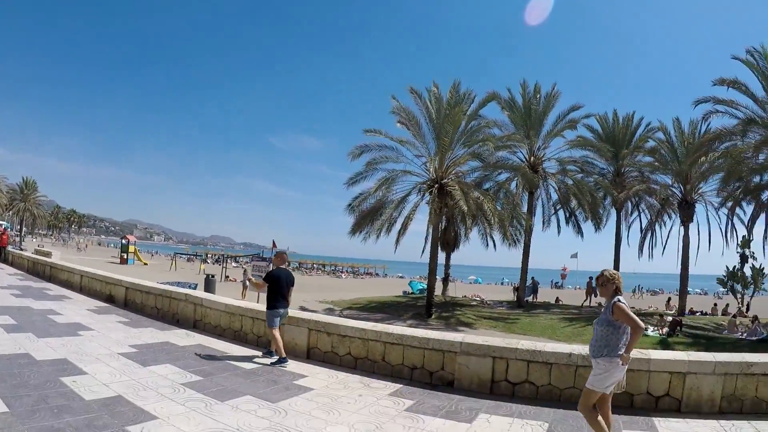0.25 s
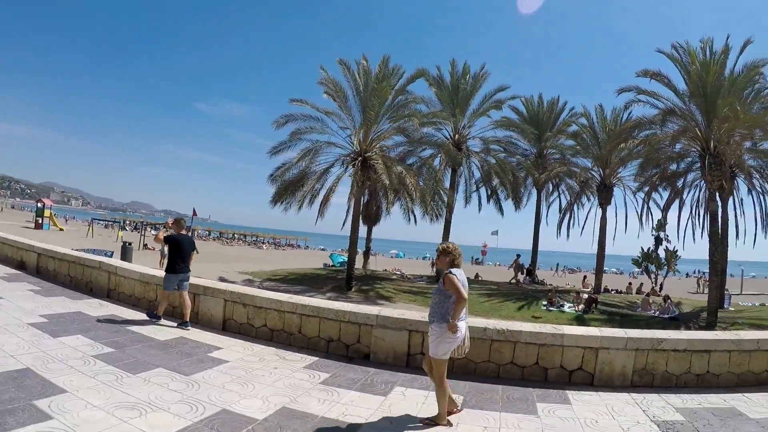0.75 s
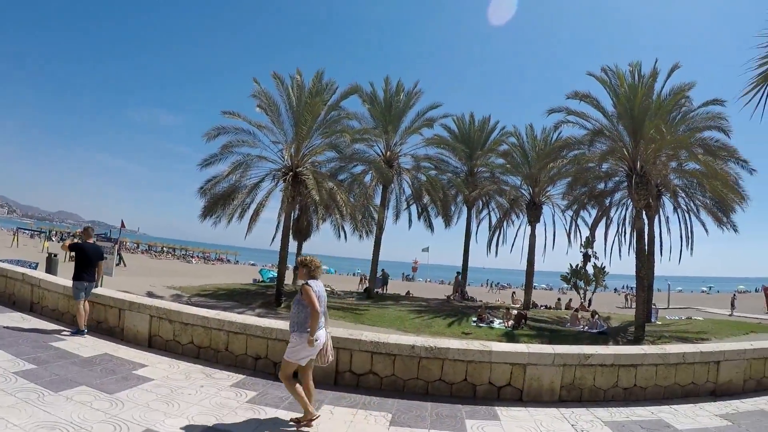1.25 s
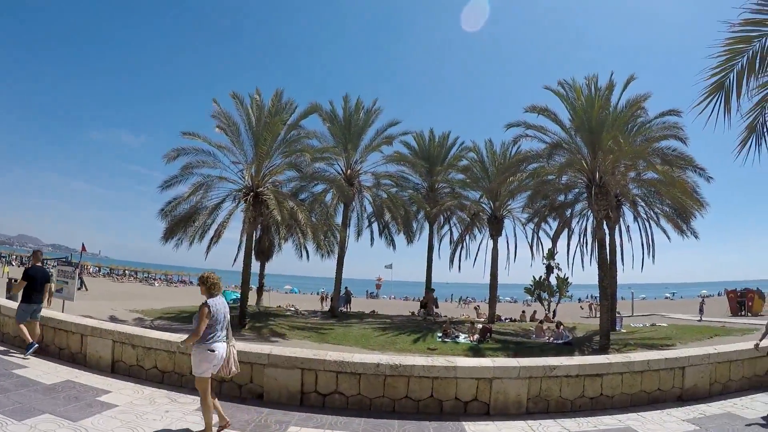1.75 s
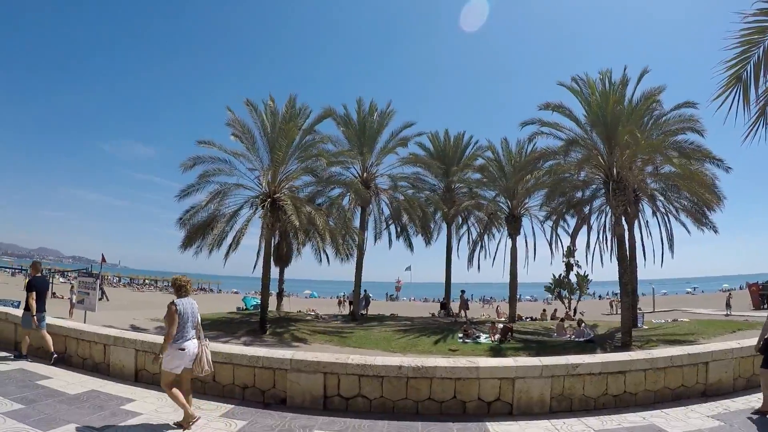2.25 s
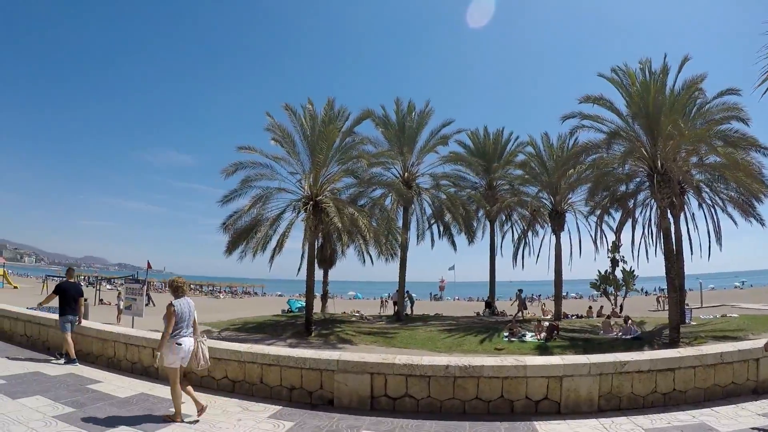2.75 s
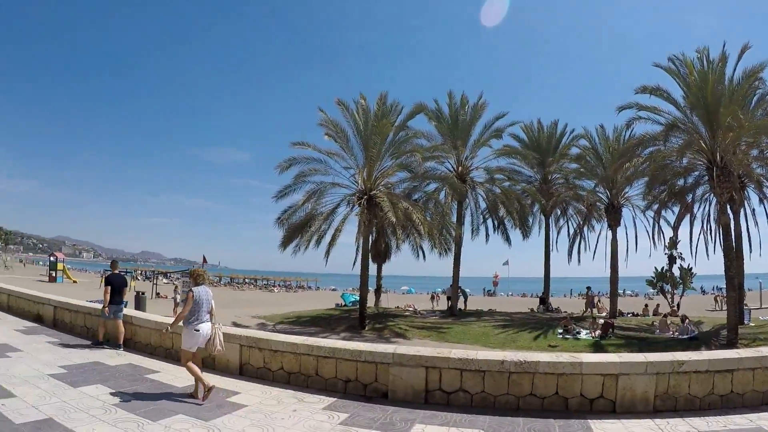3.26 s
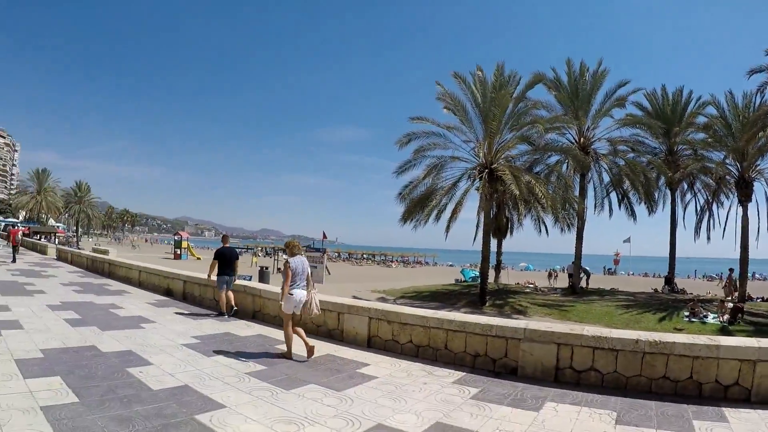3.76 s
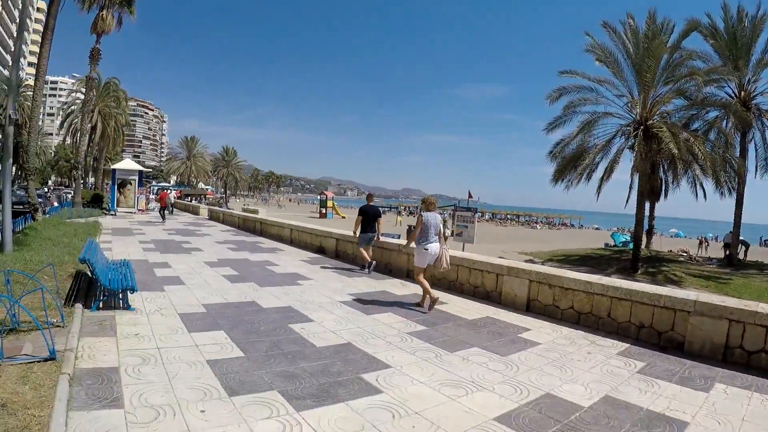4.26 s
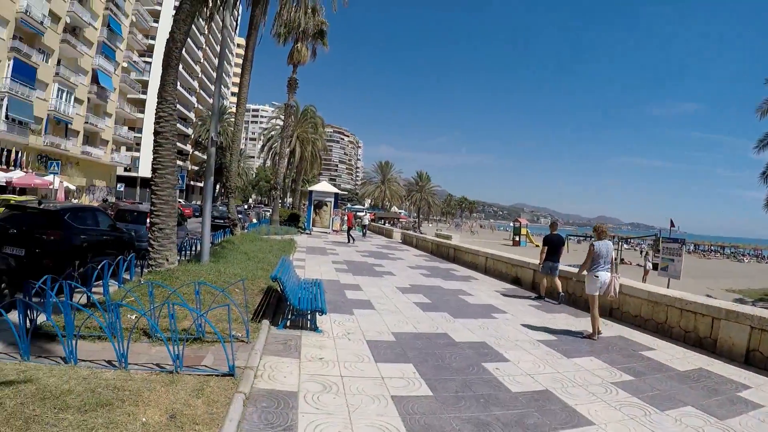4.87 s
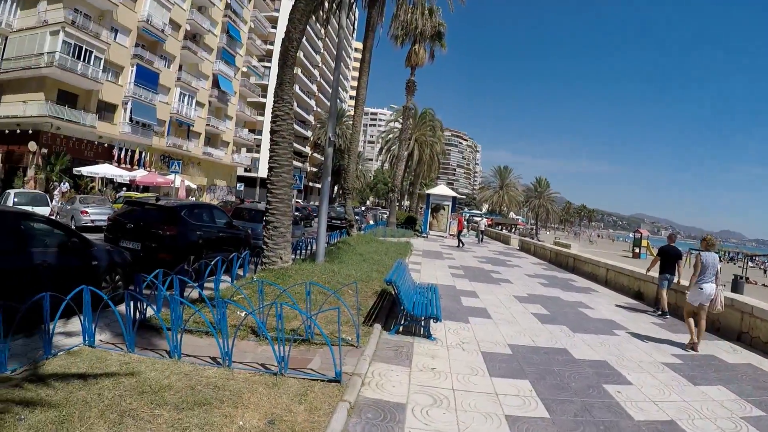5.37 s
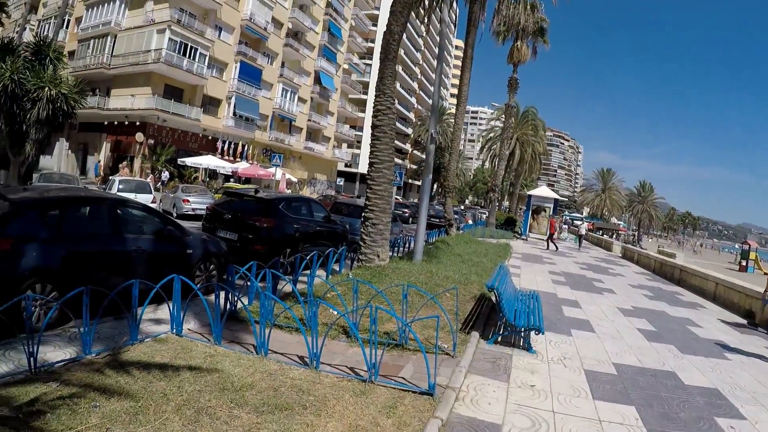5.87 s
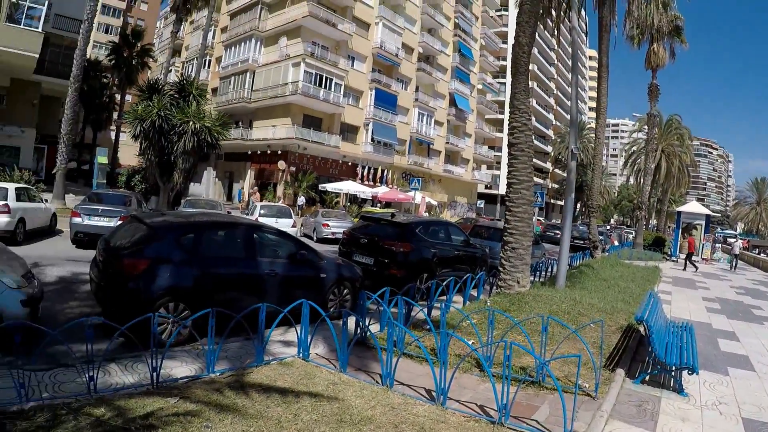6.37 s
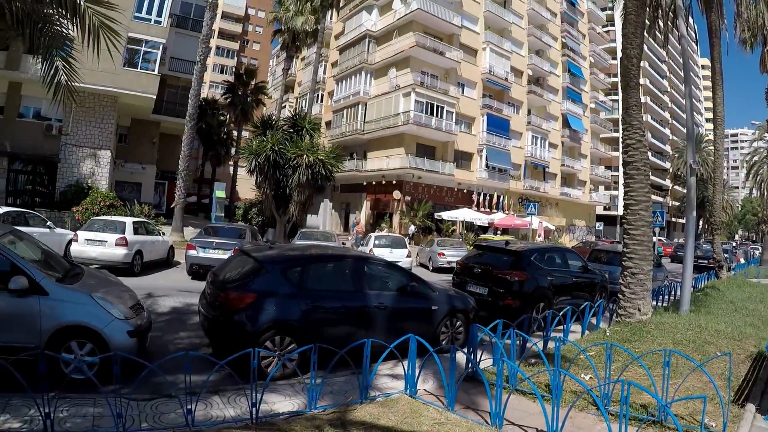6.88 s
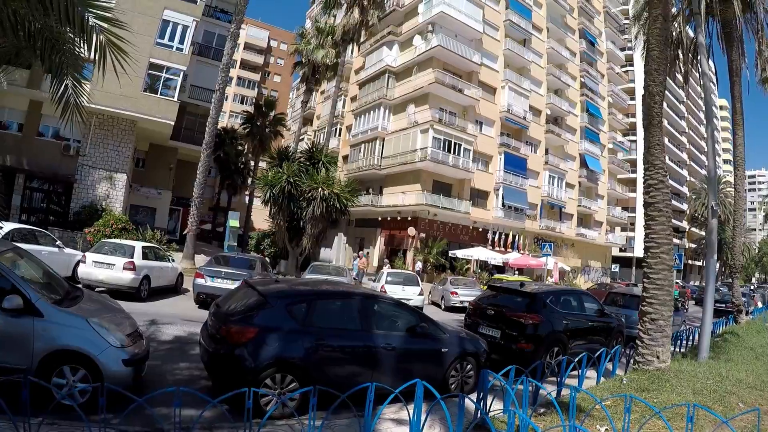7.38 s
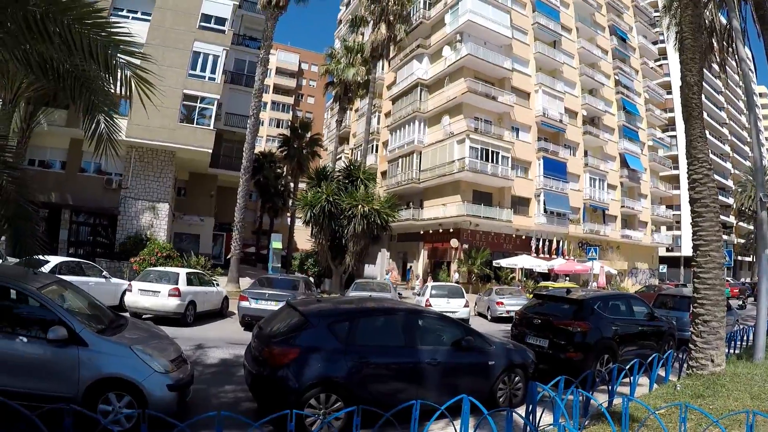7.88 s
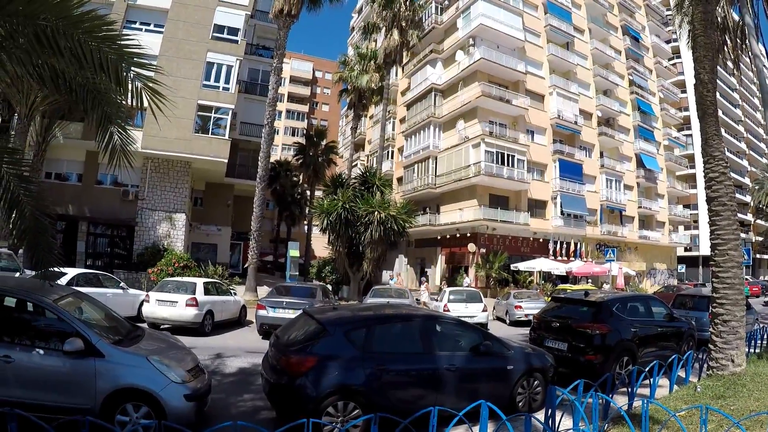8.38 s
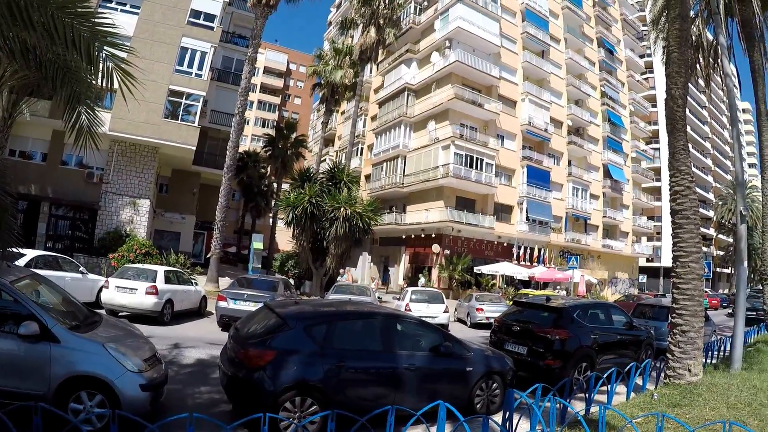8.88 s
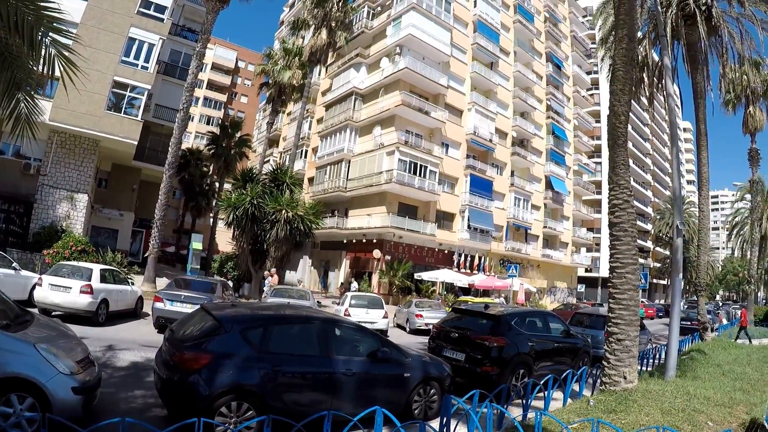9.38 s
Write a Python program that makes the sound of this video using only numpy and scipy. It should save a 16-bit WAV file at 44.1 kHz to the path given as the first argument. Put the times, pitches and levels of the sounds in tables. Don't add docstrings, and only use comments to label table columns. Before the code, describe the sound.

Harsh parrot chatter sits close and slightly left of centre, with hoarse rasps, quick warbles, a brief thin whistle near the start and chopped rattling trills later. Calls come in separate bursts, then almost without pause toward the end. Underneath, wind thumps unevenly on a small handheld stereo microphone, and a low motor tone passes. Distant surf and road noise form a soft bed, with short diffuse reflections outdoors.

```python
import sys
import numpy as np
from scipy import signal
from scipy.fft import rfft, irfft, next_fast_len
from scipy.io import wavfile
from scipy.ndimage import uniform_filter1d, map_coordinates

SR = 44100
rng = np.random.default_rng(int(sys.argv[2]) if len(sys.argv) > 2 else 0)


def volts_from_db(level):
    exponent = np.asarray(level, float) / 20
    return 10 ** exponent


def persist_wave(psi):
    counts = np.round(np.clip(psi, -1, 1) * 32767).astype(np.int16)
    wavfile.write(sys.argv[1], SR, np.atleast_2d(counts).T)


N = 424683
TIME = np.arange(N) / SR
PORTS = np.array([[.5], [-.5]])

# frequency in Hz, level in dB per Hz.
THROAT = [(600, -50), (1000, -18), (1750, -6.5), (2500, 1.5), (3200, 0), (4200, -3), (5200, -2), (6300, -1),
          (7600, -8.5), (8600, -20), (10700, -26), (14000, -45), (18000, -83)]


def unit(x):
    return x / np.sqrt(np.mean(x ** 2) + 1e-20)


def along(points, hz):
    f, v = np.transpose(points)
    return np.interp(np.log(hz + 1), np.log(f + 1), v)


def curves(rows):
    s, *cols = np.transpose(rows)
    return [np.interp(TIME, s, c) for c in cols]


def during(rows, fade):
    first, last = rows[0][0], rows[-1][0]
    return np.interp(TIME, [first - fade, first, last, last + fade], [0, 1, 1, 0])


def wobble(rate):
    return map_coordinates(rng.standard_normal(int(N * rate / SR) + 4), [TIME * rate])


def filtered(x, response):
    m = next_fast_len(N + 8192)
    return irfft(rfft(x, m) * response(np.fft.rfftfreq(m, 1 / SR)), m)[..., :N]


def coloured(spectrum):
    return unit(filtered(rng.standard_normal((2, N)), lambda hz: volts_from_db(along(spectrum, hz))))


def voice(pitch_hz, beak_hz, gain, jitter, flutter_db, beak_db, beak_octaves, under_db, under):
    on = gain > 1e-5
    pitch_hz = (pitch_hz * (1 + jitter * wobble(350)))[on]
    beak_hz = beak_hz[on]
    under_db = (under_db * np.ones(N))[on]
    phase = 2 * np.pi * np.cumsum(pitch_hz) / SR
    shimmer = wobble(130)
    sound, power = np.zeros(on.sum()), 1e-12
    for k in range(1, 15):
        octaves = np.log2(k * pitch_hz / beak_hz)
        under_octaves = np.log2(under * k * pitch_hz / beak_hz)
        lift = beak_db * np.exp(-(octaves / beak_octaves) ** 2)
        lift += under_db * np.exp(-(under_octaves / beak_octaves) ** 2)
        size = volts_from_db(along(THROAT, k * pitch_hz) + lift)
        flutter = volts_from_db(flutter_db * np.roll(shimmer, k * N // 15)[on])
        sound += size * flutter * np.sin(k * phase)
        power = power + size ** 2 / 2
    out = np.zeros(N)
    out[on] = gain[on] * sound / np.sqrt(power)
    return out


def buffeting():
    # middle in seconds, length in seconds, level in dB, left minus right in dB.
    gusts = [(0.204, 0.18, -18.5, 14), (0.66, 0.3, -26.5, 14), (3.186, 0.33, -22.5, 12),
             (3.842, 0.17, -30, 8), (4.874, 0.22, -22.5, 12), (5.047, 0.13, -24, 21),
             (5.266, 0.14, -24, 14), (5.63, 0.088, -31.5, -13), (5.995, .12, -27.5, 18),
             (6.634, 0.27, -26.5, 6.5), (6.94, 0.26, -23.5, 11.5), (7.8, 0.46, -22.5, -1.5),
             (8.12, 0.19, -25, 2), (8.55, 0.23, -18.5, 8.5), (8.929, 0.093, -28.5, 16),
             (9.515, .16, -24.5, 10.5)]
    # time in seconds, level in dB, left minus right in dB.
    breeze = [
        (0, -26, 11.5),
        (1.5, -29.5, 5),
        (2.9, -31.5, 2),
        (4.2, -29, 5),
        (6.3, -29, 7.5),
        (7.3, -30, 1),
        (9.63, -32, 4),
    ]
    breeze_db, side_db = curves(breeze)
    power = volts_from_db(2 * breeze_db)
    side = power * side_db
    for s, length, db, gust_side_db in gusts:
        part = volts_from_db(2 * db) * np.exp(-(2.54 * (TIME - s) / length) ** 2)
        power = power + part
        side = side + gust_side_db * part
    return 10 * np.log10(power), side / power


def wind():
    # frequency in Hz, level in dB per Hz.
    light_air = [(12, -38), (20, -1.5), (102, -3.5), (228, -17.5), (248, -22), (400, -47.5), (520, -69.5),
                 (880, -120)]
    # frequency in Hz, level in dB per Hz.
    hard_gust = [(12, -38), (20, -5.5), (129, 3.5), (177, -0.5), (549, -26), (595, -24.5), (900, -44),
                 (1170, -65), (1980, -120)]
    buffet_db, side_db = buffeting()
    hard = np.clip((buffet_db + 31) / 9, 0, 1)
    lumps = volts_from_db(6.4 * np.tanh(np.array([wobble(26), wobble(26)]) / 2))
    light = coloured(light_air)
    light = unit(light + 0.48 * light[::-1])
    rush = lumps * coloured(hard_gust)
    rush = unit(rush - 0.24 * rush[::-1])
    air = np.sqrt(1 - hard) * light + np.sqrt(hard) * rush
    return volts_from_db(buffet_db - 0.15 + side_db * PORTS) * air


def wash():
    # frequency in Hz, level in dB per Hz.
    surf = [(150, -21), (250, -4.5), (686, -7), (892, -9), (1230, -9), (1750, -10.5), (2560, -14.5),
            (5500, -20), (7800, -24), (9000, -29), (14000, -45.5), (18000, -68)]
    # frequency in Hz, likeness from -1 to 1.
    likeness = [(250, 0.55), (1000, -0.29), (2000, 0.086), (4000, 0.45), (8000, -0.39)]
    # frequency in Hz, left minus right in dB.
    leaning = [(500, 6), (1000, -1), (8000, 1)]
    # time in seconds, nearness in dB.
    traffic = [
        (0.0, -43.5),
        (0.51, -47.5),
        (1.45, -48.5),
        (1.74, -44.5),
        (2.55, -47.5),
        (5.2, -47),
        (5.74, -46),
        (6.01, -45.5),
        (9.17, -47.5),
        (9.63, -44.5),
    ]

    def spread(hz):
        turn = np.arccos(np.clip(along(likeness, hz), -1, 1)) / 2
        return np.array([np.cos(turn), np.sin(turn)])

    mid, side = filtered(coloured(surf), spread)
    both = filtered(np.array([mid + side, mid - side]), lambda hz: volts_from_db(along(leaning, hz) * PORTS))
    ripple_db = 1.13 * np.array([wobble(9), wobble(9)])
    return volts_from_db(curves(traffic)[0] + 8.0 + 0.64 * wobble(3.5) + ripple_db) * both


def effort():
    # start in seconds, length in seconds, rasp in dB, brightness in dB.
    squawks = [(0.264, 0.12, -30, 1.5), (0.568, 0.08, -25, 0), (0.684, 0.054, -23, -0.5),
               (1.768, 0.2, -29, -4), (2.131, 0.12, -28, -3), (2.417, 0.12, -24.5, -14),
               (2.544, 0.049, -20.5, -17), (3.094, 0.17, -23.5, -8), (3.615, 0.13, -24, -2),
               (3.915, 0.081, -22, -6.5), (4.041, 0.042, -25.5, -9.5), (4.94, 0.081, -29, -5.5),
               (5.055, 0.34, -32.5, -8), (5.251, 0.024, -27, 0), (5.323, 0.2, -26.5, -2),
               (5.877, 0.055, -20, -7.5), (6.035, 0.063, -20, -4.5), (6.261, 0.16, -20.5, -2),
               (6.415, 0.3, -27, 3.5), (6.667, 0.2, -19.5, -5), (6.95, 0.353, -26, -2.5),
               (7.392, .21, -26, -12), (7.755, 0.15, -23.5, -8), (7.958, 0.26, -22.5, -8),
               (8.255, 0.31, -22, -5), (8.566, 0.24, -25, 0), (8.882, 0.22, -22.5, -7.5),
               (9.171, 0.21, -25, -1.5), (9.379, 0.14, -24, -2), (9.463, 0.11, -25.5, -0.5)]
    # start in seconds, length in seconds, rasp in dB, brightness in dB.
    far_calls = [(0.05, 0.023, -33, -1), (1.105, 0.13, -34.5, -2), (1.468, 0.078, -39.5, -6),
                 (1.68, 0.077, -43, -11), (2.31, 0.077, -32, -10), (2.64, 0.023, -37, 12),
                 (2.862, 0.13, -38.5, -5.5), (3.386, 0.098, -30, -29), (3.527, 0.1, -30.5, -9.5),
                 (4.176, 0.033, -41.5, -1), (4.692, 0.026, -37.5, -1), (5.573, 0.3, -32.5, 0),
                 (6.167, 0.087, -26, -2.5)]
    attack_s, release_s, sag_db_per_s = 0.021, 0.023, 11.5
    linger_db, linger_t60 = -12, 0.81
    murmur_db, murmur_bright_db = -72, 8
    power = np.full(N, volts_from_db(2 * murmur_db))
    bright = power * murmur_bright_db
    for s, length, db, bright_db in [*squawks, *far_calls]:
        first = round(s * SR)
        t = TIME[first:][:SR] - s
        body = np.clip(t / attack_s, 0, 1) * volts_from_db(-sag_db_per_s * (t - length / 2))
        body = body * np.clip((length - t) / release_s + 1, 0, 1)
        linger = volts_from_db(linger_db - 60 * np.abs(t - length) / linger_t60) * (t > length)
        part = volts_from_db(2 * db) * (body ** 2 + linger ** 2)
        power[first:][:SR] += part
        bright[first:][:SR] += bright_db * part
    return 10 * np.log10(power), bright / power


def flock():
    rasp_db, bright_db = effort()
    birds = np.zeros((2, N))
    for side_db in (-1.5, 4.5):
        flips = .26 * np.tanh(1.2 * wobble(140))
        pitch = 1500 * np.exp(flips + .015 * wobble(400))
        half = np.pi * np.cumsum(pitch) / SR
        pulses = np.sin(19 * half) / (np.sin(half) + 1e-9)
        hoarse = unit(np.clip(pulses, -19, 19)) + .65 * rng.standard_normal((2, N))
        birds += volts_from_db(2.5 * wobble(45) + side_db * PORTS) * hoarse

    def throat(hz):
        return volts_from_db(along(THROAT, hz))

    def upper(hz):
        return 1 / (1 + (4800 / (hz + 1)) ** 8)

    low = unit(filtered(birds, lambda hz: throat(hz) * (1 - upper(hz))))
    high = unit(filtered(birds, lambda hz: throat(hz) * upper(hz)))
    return volts_from_db(rasp_db - 7) * (low + volts_from_db(bright_db) * high)


def notes():
    # start in seconds, level in dB.
    openings = [(0.273, -42), (2.147, -40), (2.212, -36), (3.099, -32), (3.628, -29.5), (3.925, -29.5),
                (5.897, -28), (7.765, -36), (8.263, -32), (8.393, -29.5), (8.88, -28), (9.183, -30),
                (9.478, -32)]
    # start in seconds, length in ms, pitch
    # in Hz, level in dB.
    held_notes = [(.299, 18.4, 970, -31.5), (.053, 27, 762, -37), (.577, 27.5, 912, -37),
                  (.728, 62, 1210, -42.5), (.82, 40, 1263, -46), (1.511, 18.7, 634, -36),
                  (1.545, 36, 1047, -42.5), (1.733, 23.5, 743, -42), (1.918, 15.7, 1085, -35),
                  (1.684, 22, 1082, -43), (2.07, 26, 700, -38), (3.128, 22, 1118, -30.5),
                  (.692, 34, 1339, -34), (1.206, 49, 1834, -37), (1.783, 28, 990, -28),
                  (2.182, 39, 955, -33.5), (2.346, 25, 895, -34.5), (2.436, 26.7, 936, -27),
                  (2.466, 26, 1166, -27.5), (3.168, 13.4, 1320, -28.5), (3.644, 15, 1083, -27.5),
                  (3.716, 45, 1257, -34), (3.938, 23, 948, -23), (3.963, 24, 1124, -27),
                  (5.085, 59, 1128, -33.5), (5.271, 15.4, 1168, -29.5), (5.488, 17, 1049, -29),
                  (6.058, 33, 1330, -26), (6.172, 24, 1293, -33), (6.283, 25.5, 1041, -23),
                  (6.317, 26, 1313, -22), (7.787, 16.7, 927, -28), (7.975, 33, 1295, -32.5),
                  (8.132, 14.7, 1202, -26), (8.215, 26, 1171, -34.5), (8.304, 21, 1148, -25),
                  (8.452, 13.7, 2250, -30), (8.476, 12.7, 2068, -23), (8.663, 20.3, 1925, -18.5),
                  (8.941, 37.6, 1299, -24), (8.899, 14.5, 1231, -26), (9.222, 18.2, 1042, -23),
                  (9.256, 26, 1112, -24.5), (9.362, 22, 950, -34), (9.4, 22, 970, -33)]
    # start in seconds, pitch in Hz, level in dB.
    jumps = [(1.859, 2027, -37), (2.502, 1914, -31), (2.562, 2130, -35), (2.586, 1800, -36),
             (3.251, 1563, -34), (5.147, 1705, -47), (5.921, 1890, -32), (8.051, 2104, -29.5),
             (8.12, 2020, -26.5), (8.529, 2413, -28), (3.662, 1950, -31), (6.349, 2040, -24.5),
             (7.522, 2336, -35), (8.015, 2100, -27), (8.15, 2125, -25.5), (8.333, 2120, -21),
             (8.371, 2190, -27.5), (8.435, 2150, -25.5), (8.51, 2108, -26.5), (8.692, 2330, -35),
             (8.772, 2198, -25), (8.925, 2000, -22), (8.986, 2060, -23), (9.019, 2032, -31),
             (9.295, 1933, -28), (9.349, 2296, -31), (9.424, 1646, -33.5), (9.548, 2030, -28),
             (9.597, 2000, -27)]
    # start in seconds, pitch in Hz, level in dB.
    dips = [(3.53, 1250, -36), (7.892, 1050, -31), (8.034, 1276, -34), (8.072, 1240, -30),
            (2.894, 1620, -40), (1.882, 827, -30.5), (7.357, 1397, -35), (7.378, 1297, -32.5),
            (7.42, 1052, -32), (8.282, 1201, -32), (8.351, 1176, -23.5), (8.561, 1435, -30),
            (8.613, 1487, -28), (8.632, 1494, -30.5), (9.458, 976, -31)]
    # start in seconds, length in ms, start pitch in Hz, level in dB.
    falls = [(.356, 36, 1620, -34.5), (.606, 50, 1452, -32.5), (1.157, 17, 1855, -38),
             (3.425, 40, 1580, -35.5), (3.472, 45, 1643, -39.5), (3.698, 16, 1750, -30.5),
             (7.876, 14, 1707, -44), (8.786, 26, 1646, -29.5), (8.191, 16, 1902, -28.5),
             (9.209, 12, 1395, -24)]
    open_ms, open_hz, open_rise = 20, 773, 1.14
    jump_ms, jump_fall, dip_ms = 14, .92, 15
    leg_ms, leg_from = 5, .8
    held_rise, fall_to = 1.03, .66
    rows = [(s, open_ms, open_hz, open_hz * open_rise, db) for s, db in openings]
    rows += [(s, ms, hz / held_rise ** .5, hz * held_rise ** .5, db) for s, ms, hz, db in held_notes]
    rows += [(s, jump_ms, hz, hz * jump_fall, db) for s, hz, db in jumps]
    rows += [(s - leg_ms / 1000, leg_ms, hz * leg_from, hz, db + 4.0) for s, hz, db in jumps]
    rows += [(s, dip_ms, hz, hz * held_rise, db) for s, hz, db in dips]
    rows += [(s, ms, hz, hz * fall_to, db) for s, ms, hz, db in falls]

    def free(s):
        return not any(s < row[0] < s + (jump_ms + leg_ms) / 1000 for row in rows)

    rows += [(s + jump_ms / 1000, leg_ms, hz * jump_fall, hz * fall_to, db - 3) for s, hz, db in jumps if free(s)]
    s, ms, *rest = np.transpose(sorted(rows))
    return [s, np.minimum(ms, 1000 * np.append(np.diff(s), 1)), *rest]


def calls():
    # time in seconds, resonance in Hz.
    beak = [(0, 5170), (.26, 4400), (.345, 2780), (.66, 2490), (.685, 6700), (.728, 2490), (1.15, 2600),
            (1.2, 3180), (1.4, 2300), (1.73, 3300), (1.775, 4700), (1.792, 3070), (1.855, 3900),
            (2.0, 2340), (2.33, 1820), (2.42, 3040), (2.465, 4480), (2.495, 3705), (3.12, 2524),
            (3.155, 3580), (3.35, 2720), (3.64, 3726), (3.69, 2600), (3.9, 4610), (4.9, 2600), (5.4, 4300),
            (5.8, 3110), (6.05, 2645), (6.27, 5600), (6.31, 4600), (6.345, 3730), (7.3, 2300), (7.41, 4300),
            (7.7, 3880), (8.128, 2610), (8.148, 4030), (8.2, 2635), (8.325, 4190), (8.611, 3010),
            (8.645, 3930), (8.935, 5040), (8.98, 3895), (9.2, 4870), (9.247, 4360), (9.36, 2900),
            (9.395, 3900), (9.42, 3100), (9.49, 3900)]
    snap_s = .003
    s, ms, start_hz, end_hz, db = notes()
    end = s + ms / 1000
    leave = end - snap_s
    arrive = np.maximum(leave, np.append(s[1:], 10) - snap_s)
    pitch_times = np.ravel([s, leave, arrive], "F")
    log_pitch = np.log(np.ravel([start_hz, end_hz, end_hz], "F"))
    pitch = np.exp(uniform_filter1d(np.interp(TIME, pitch_times, log_pitch), size=190))
    note = np.clip(np.searchsorted(s, TIME) - 1, 0, None)
    held = (TIME > s[note] - .001) & (TIME < end[note] + .004)
    slide = np.append(s[1:] - end[:-1] < .014, False)[note] & (TIME > s[0])
    gate = np.abs(uniform_filter1d(np.where(held, 1, volts_from_db(-4) * slide), size=250))
    at, hz = np.transpose(beak)
    gape = uniform_filter1d(hz[np.clip(np.searchsorted(at, TIME) - 1, 0, None)], size=200)
    level_times = np.ravel([s + .001, end - .001], "F")
    gain = gate * volts_from_db(np.interp(TIME, level_times, np.repeat(db, 2)) - 2.5)
    sound = voice(pitch, gape, gain, jitter=.016, flutter_db=4, beak_db=13, beak_octaves=.27, under_db=2, under=1.65)
    return sound, gate


def knocks():
    # start in seconds, peak in dB, left minus right in dB.
    puffs = [
        (1.978, -27, 10),
        (2.651, -21, -4),
        (3.817, -19.5, -7),
        (4.868, -13, -8),
        (5.622, -22, -13),
        (5.828, -25.5, -20),
        (8.488, -14.5, -12),
    ]
    # start in seconds, peak in dB.
    ticks = [
        (0.207, -16),
        (0.604, -26),
        (1.2055, -18),
        (.7, -19),
        (1.473, -31),
        (1.635, -30),
        (1.724, -28),
        (4.2933, -21),
    ]
    out, t = np.zeros((2, N + SR)), np.arange(SR // 10) / SR
    for s, db, side_db in puffs:
        puff = np.sin(2 * np.pi * 135 * t * np.exp(-t / 0.045)) * volts_from_db(-60 * t / 0.1)
        out[:, round(s * SR):][:, :len(t)] += volts_from_db(db + 0.5 + side_db * PORTS) * puff
    for s, db in ticks:
        soft = uniform_filter1d(uniform_filter1d(rng.standard_normal(len(t)), size=4), size=3)
        click = volts_from_db(db - 11 - 60 * t / .012) * soft
        ring = volts_from_db(db - 8.5 - 60 * t / 0.015) * np.sin(2 * np.pi * 1750 * t)
        out[:, round(s * SR):][:, :len(t)] += click + ring
    return out[:, :N]


def engine():
    # time in seconds, firing rate in Hz, level in dB.
    motor = [
        (.9, 112.1, -36.5),
        (1.6, 115.9, -32),
        (2.2, 131.4, -32),
        (2.8, 115.9, -35.5),
        (3.0, 120.8, -41),
    ]
    hz, db = curves(motor)
    phase = 2 * np.pi * np.cumsum(hz * (1 + 0.0247 * wobble(17))) / SR
    tone = np.sin(phase) + volts_from_db(-3.0) * np.sin(1.1 * phase)
    return during(motor, 0.5) * volts_from_db(db + 1.5 + 1.7 * wobble(14)) * tone


def whistle():
    # time in seconds, pitch in Hz, level in dB.
    thin_tone = [
        (.465, 5320, -46),
        (.478, 5350, -40),
        (.484, 5370, -30),
        (.52, 5410, -31),
        (.56, 5420, -47),
        (.605, 5470, -31),
    ]
    hz, db = curves(thin_tone)
    phase = 2 * np.pi * np.cumsum(hz * (1 + 0.0177 * wobble(340))) / SR
    tone = np.sin(phase) + volts_from_db(-27) * np.sin(2 * phase)
    return during(thin_tone, 0.009) * volts_from_db(db + 2.5 + 2.5 * wobble(81.0)) * tone


def warbler():
    # start in seconds, end in seconds, pitch in Hz, swings per second, level in dB.
    warbles = [(1.813, 1.858, 1522, 56, -37), (3.166, 3.275, 1876, 39, -41.5),
               (7.05, 7.2, 1547, 116, -35.5), (7.434, 7.517, 1900, 68, -34.5),
               (7.553, 7.612, 1700, 35, -38), (7.806, 7.875, 1712, 55, -36.5), (9.045, 9.11, 1600, 60, -39),
               (8.085, 8.118, 1600, 70, -30), (8.552, 8.66, 1980, 63, -29.5), (8.713, 8.775, 2153, 51, -33),
               (8.955, 9.04, 1917, 43, -31.5), (9.285, 9.345, 1887, 56, -37), (9.491, 9.63, 1933, 46, -34)]
    pitch, gain, stumble = np.ones(N), np.zeros(N), wobble(40)
    for start, end, hz, rate, db in warbles:
        on = (TIME >= start) & (TIME < end)
        t = TIME[on] - start
        swing = -np.cos(2 * np.pi * (rate * t + 0.119 * stumble[on]))
        pitch[on] = hz * (1 + 0.121 * swing * (1 + 0.307 * stumble[::-1][on]))
        gain[on] = volts_from_db(db + 2.7 * swing) * np.clip(np.minimum(t, end - start - t) / 0.0089, 0, 1)
    return voice(pitch, 2 * pitch, gain, jitter=.015, flutter_db=4, beak_db=11, beak_octaves=.3, under_db=0, under=1.5)


def whine():
    # time in seconds, level in dB.
    tyres = [
        (2.8, -52),
        (5.6, -50.5),
    ]
    centre_hz, width_hz = 696, 35
    db, = curves(tyres)
    band = filtered(rng.standard_normal((2, N)), lambda hz: np.exp(-((hz - centre_hz) / width_hz) ** 2))
    return during(tyres, 0.14) * volts_from_db(db + 2.3 * wobble(4.2)) * unit(band)


def trills():
    # pitch in Hz, beak resonance in Hz, slowing in rattles per second squared,
    # lift of the lower resonance in dB, sound left between rattles.
    rattlers = [
        (872, 6580, 6.4, 11.3, 0.23),
        (1368, 4110, 1.14, 11.7, 0.15),
        (1015, 6570, 6.9, 18, 0.19),
        (654, 4980, 21.3, 7.9, 0.045),
        (874, 6200, 4.1, 14, 0.36),
        (1011, 6400, 6, 15, 0.17),
    ]
    # start in seconds, end in seconds, rattles per second, level in dB.
    shrill = [(6.971, 7.29, 44, -26.5)]
    dull = [(5.172, 5.412, 38.25, -39.5), (5.596, 5.656, 40, -45), (5.683, 5.893, 41.6, -39)]
    middle = [(5.413, 5.501, 43.4, -33), (6.189, 6.27, 45.9, -38.5)]
    tired = [(4.928, 5.055, 40.8, -34)]
    long_winded = [(6.425, 6.68, 46, -27.5)]
    harsh = [(6.685, 6.864, 47, -27)]
    pitch, beak_hz, gain, chop, lower_db = np.ones((5, N))
    gain, stumble = gain * 0, wobble(25)
    for bird, rows in zip(rattlers, (shrill, dull, middle, tired, long_winded, harsh)):
        hz, resonance_hz, slowing, under_db, left = bird
        for start, end, rate, db in rows:
            on = (TIME >= start) & (TIME < end)
            t = TIME[on] - start
            cycle = (rate * t - slowing * t ** 2 + .04 * stumble[on]) % 1
            pitch[on] = hz * (1 - 0.059 * np.exp(-cycle / 0.09))
            beak_hz[on], lower_db[on] = resonance_hz, under_db
            chop[on] = left + np.sin(np.pi * np.clip(cycle / .75, 0, 1) ** .6) ** .7
            breath = np.abs(np.sin(np.pi * (0.056 + 1.06 * t / (end - start)))) ** .5
            edges = np.clip(np.minimum(t, end - start - t) / .004, 0, 1)
            gain[on] = volts_from_db(db) * chop[on] * breath * edges
    sound = voice(pitch, beak_hz, gain, jitter=.014, flutter_db=4.5, beak_db=16, beak_octaves=.17,
                  under_db=lower_db, under=1.5)
    return sound, chop


def scatter(x, t60, wet_db):
    t = np.arange(SR // 3) / SR
    tail = rng.standard_normal((2, len(t))) * volts_from_db(-60 * t / t60) * (1 - np.exp(-t / 0.015))
    return volts_from_db(wet_db) * signal.fftconvolve(x[None], tail / np.linalg.norm(tail[0]), axes=1)[:, :N]


def scene():
    warble, held = calls()
    rattle, chop = trills()
    near = warble + warbler() + rattle + whistle()
    echo = scatter(near, t60=.18, wet_db=-10)
    rasp = flock() * chop ** .45 * (1 - .6 * held)
    birds = near * volts_from_db([[1.2], [-1.2]]) + rasp
    birds[0] = np.roll(birds[0], -1)
    return birds + echo + wind() + knocks() + engine() + wash() + whine()


def top_cut(x):
    return signal.sosfilt(signal.butter(12, 14950, fs=SR, output="sos"), x)


def record(dry):
    return top_cut(dry)


dry = scene()
out = record(dry)
persist_wave(out)
```